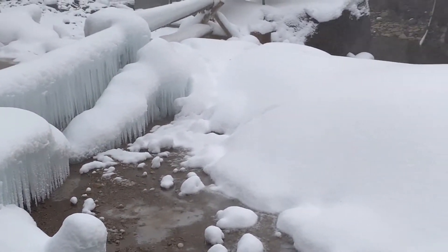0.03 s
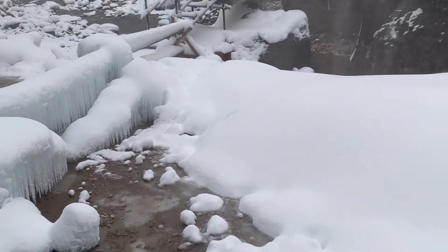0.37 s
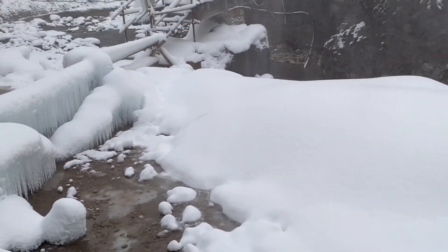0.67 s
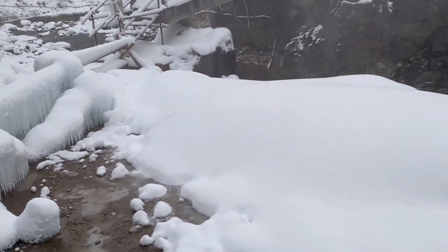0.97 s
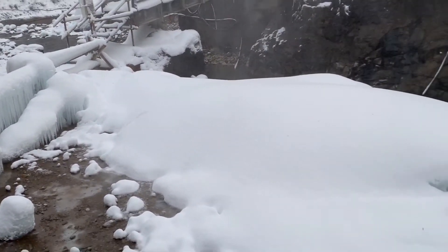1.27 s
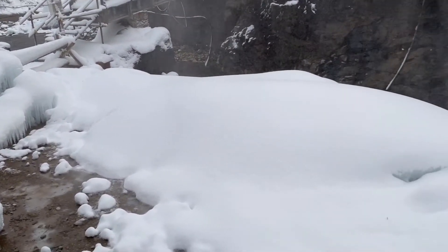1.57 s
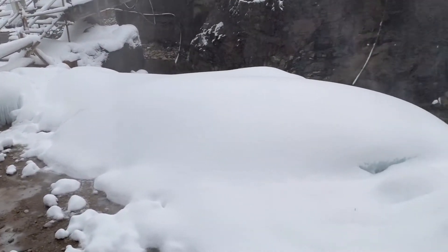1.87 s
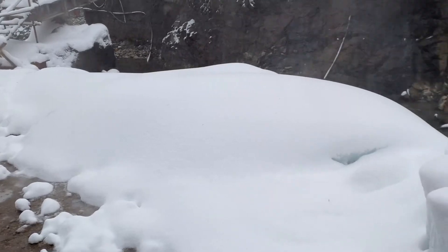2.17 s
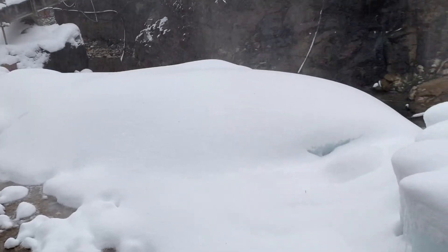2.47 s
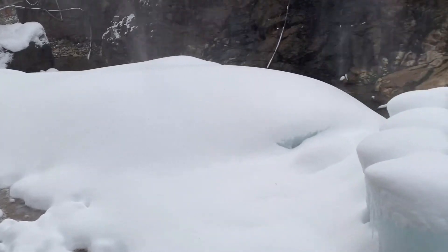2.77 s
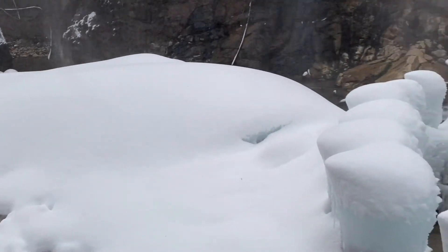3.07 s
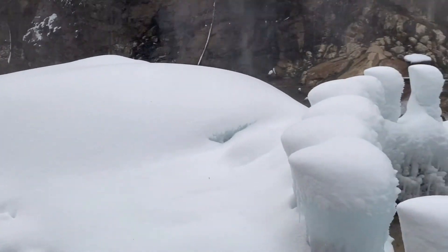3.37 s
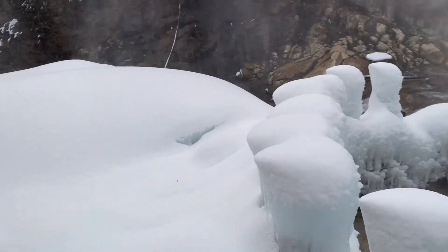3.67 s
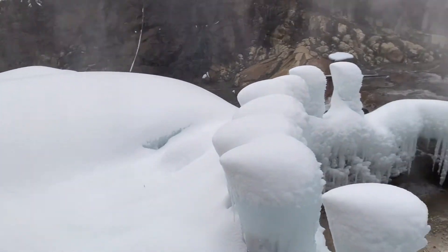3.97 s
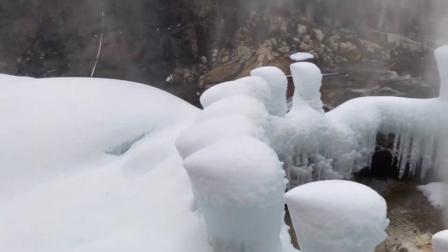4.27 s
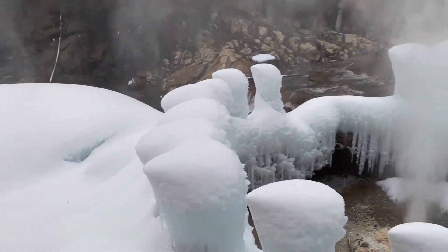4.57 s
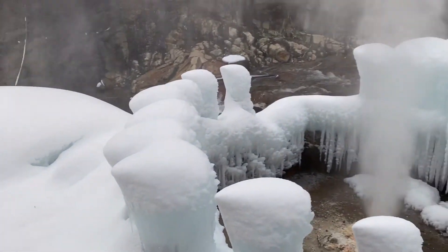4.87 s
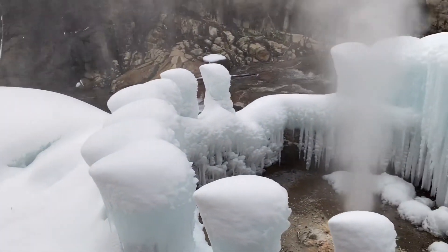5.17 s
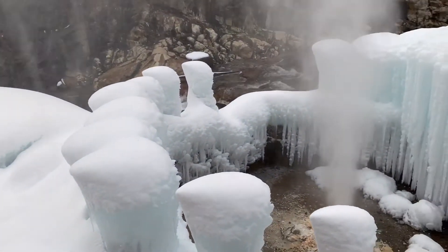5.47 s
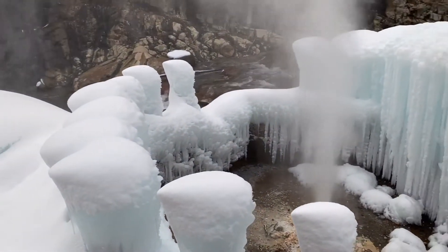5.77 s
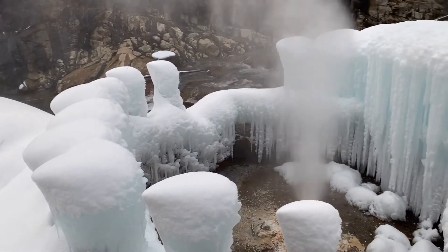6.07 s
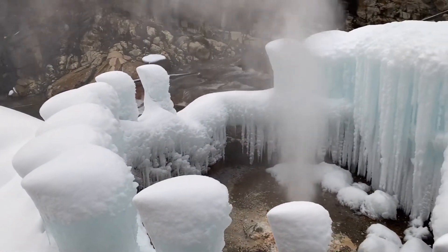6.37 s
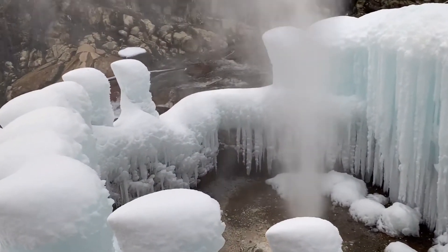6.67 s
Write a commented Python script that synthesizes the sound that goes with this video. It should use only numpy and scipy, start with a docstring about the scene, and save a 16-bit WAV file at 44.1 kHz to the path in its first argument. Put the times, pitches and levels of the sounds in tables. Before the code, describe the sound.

Outdoors, a jet of steam and boiling water hisses in quick, irregular surges, topped by a fine fizzing spray. Its mouth churns, gurgles and faintly hoots while a deep rumble pulses from underground. Everything sounds together from start to finish. The stereo microphone turns slowly toward the vent, so the spouting shifts from the right to straight ahead.

```python
"""A hot spring among snowy rocks, its vent blowing a jet of steam and boiling water.
Underground, collapsing steam pockets make the shaft throb. The mouth roars in hollow resonances,
hoots as steam blows across it and gulps as big bubbles burst; spurts of water hiss and spatter.
The stereo microphone starts with the vent far to its right, the mouth behind a snow bank,
and slowly turns to face it."""
import sys
import numpy as np
from scipy import signal
from scipy.fft import rfft, irfft, next_fast_len
from scipy.io import wavfile
from scipy.ndimage import uniform_filter1d, map_coordinates

SR = 44100
rng = np.random.default_rng(int(sys.argv[2]) if len(sys.argv) > 2 else 0)


def persist_wave(psi):
    """Save psi, clipped to +-1, as 16-bit WAV."""
    counts = np.round(np.clip(psi, -1, 1) * 32767).astype(np.int16)
    wavfile.write(sys.argv[1], SR, np.atleast_2d(counts).T)


N = 296793
TIME = np.arange(N) / SR

# deep rumble of the boiling shaft: (frequency [Hz], relative level [dB])
RUMBLE_SPECTRUM = [(15, -32), (28, -19), (35, -8.5), (52, -2), (70, -5.5), (90, -5.5), (140, -40),
                   (300, -90)]
# water column simmering between throbs: (frequency [Hz], relative level [dB])
COLUMN_SPECTRUM = [(70, -46), (90, -43), (105, -3), (119, -2.5), (140, -4.5), (165, -8.5), (195, -15),
                   (260, -57), (500, -93)]
# steam pockets collapsing underground: (time [s], half length [s], column pitch [Hz], level [dB])
SHAFT_THROBS = [(.19, .06, 121, -24), (.497, .028, 117, -23.5), (.659, 0.058, 118, -25),
                (.784, .022, 160, -25), (.877, 0.036, 116, -21.5), (.955, 0.031, 119, -21),
                (1.057, .03, 117, -24), (1.239, .022, 129, -23), (1.736, 0.043, 130, -23),
                (1.904, 0.056, 130, -22.5), (2.386, .045, 120.8, -25.5), (2.733, 0.04, 122, -22.5),
                (3.101, 0.039, 119.5, -25), (3.278, .03, 118, -22), (3.379, 0.024, 117, -22.5),
                (3.523, 0.033, 119, -20.5), (3.685, 0.043, 124, -25.5), (3.807, .025, 124, -25),
                (3.94, .05, 160, -28), (4.092, 0.022, 129, -21), (4.343, 0.034, 119, -21),
                (4.514, 0.032, 118, -23.5), (4.66, 0.027, 119, -21), (4.741, 0.022, 137, -19),
                (4.885, .03, 126, -24.5), (5.012, .03, 133, -21), (5.124, .03, 115, -21),
                (5.253, .028, 155, -25), (5.59, .04, 113, -23), (5.726, 0.024, 132, -20.5),
                (5.837, .022, 129, -23), (6.124, 0.036, 123, -20.5), (6.238, .022, 146, -27),
                (6.379, 0.024, 112, -22), (6.453, .028, 124, -25), (6.681, 0.028, 118, -21)]
# hollows of the vent and its basin: (pitch [Hz], width [Hz], relative level side-on [dB], head-on [dB])
VENT_RESONANCES = [(244.4, 37, -2.5, -5.5), (303.4, 15, 0.7, -4), (386, 18, 1, -4), (429, 14.7, 1, -1),
                   (473.5, 32, -8, -4), (590.7, 40.4, -2.5, -3.5), (636, 16, -5, -34), (788, 33, -30, -5),
                   (875, 68, -28, -10.5), (890, 13, -2, -8), (964, 48, -4, -9.5), (1006, 38, -14, -7.5),
                   (1103, 75, -18, -12.5), (1125, 44, -12, -25), (1242.6, 14, -16, 0.5),
                   (1377, 39, -0.5, -3.5), (1515, 31, -4, -5.5), (1590, 42, -7, -10), (1754, 44, -9, -9),
                   (1903, 27, -4.5, -4), (1968, 88, -34, -6), (2085, 58, -16, -4)]
# the biggest slugs of water leaving the vent: (time [s], surge of the flow [relative])
WATER_SPURTS = [(.183, 0), (.312, 1.9), (.55, 1.5), (1.063, 2), (1.276, 1), (1.503, 1.5), (1.853, 0),
                (1.98, 2.2), (2.137, 1), (2.305, 1.2), (2.457, 0.8), (2.774, 2), (2.983, 2.2), (3.086, 1.9),
                (3.214, 1.7), (3.48, 0.5), (4.123, 2), (4.26, 2), (4.36, 1.6), (4.46, 1), (4.67, 1.3),
                (4.792, 2), (5.017, 2.3), (5.526, 1.5), (5.664, 1.7), (5.766, 2.5), (5.877, 3), (6.122, 1),
                (6.288, 3.5), (6.382, 1.7), (6.452, 2), (6.537, 1.8), (6.697, 2.5)]
# the jet as heard at the microphone: (time [s], hiss level [dB], base level of the spray [dB])
JET_LEVELS = [(0, -29.5, -41.5), (1.55, -29.5, -37.5), (2.3, -26, -37), (3.4, -23, -39.5),
              (4.35, -23, -39.5), (5.4, -25, -37.5), (6.73, -28, -39)]
# steam hiss: (frequency [Hz], relative level side-on [dB], half turned [dB], head-on [dB])
HISS_SPECTRA = [(1640, -41, -44, -7.5), (2020, 5.5, 9, -9), (2370, 5.5, -1, 4), (2800, -3, 6, 1),
                (2930, -1, -5, 2), (3620, -3, 0.5, 3), (4480, -2.5, -8, 2), (4930, -6.5, -8.5, -4.5),
                (5240, -3, -13.5, -3.5), (6850, -9.5, -16.5, -21.5), (6960, -68, -27, -59),
                (14100, -71, -84, -76)]
# echoes off nearby ground and ice: (delay [ms], gain side-on [ratio], half turned [ratio], head-on [ratio])
WALL_ECHOES = [(2.1, -0.02, 0.091, -0.15), (4.0, -0.14, -0.31, -0.14), (5.6, -0.15, 0.037, -0.33),
               (6.5, 0.4, 0.39, 0.26), (7.35, 0.43, 0.38, 0.068), (8.0, -0.04, -0.019, 0.13)]
# peaks and notches drifting through roar and hiss as the microphone moves:
# (time [s], half length [s], centre [Hz], drift [Hz/s], half width [Hz], gain [dB])
DRIFTING_BANDS = [(0.8, 0.26, 1260, -100, 130, 0), (0.2, 0.72, 1430, 0, 90, -0.5),
                  (0.6, 0.5, 930, -2, 60, 2.5), (0.6, 0.99, 2200, 0, 70, -8), (0.6, 0.86, 2320, 0, 45, 5),
                  (0.6, 0.78, 2490, 0, 90.5, -3), (1.15, 0.27, 4060, 0, 119, -4),
                  (1.4, 0.37, 2980, -150, 150, 5), (1.6, .6, 3260, -250, 150, -2.5),
                  (1.4, 0.55, 4780, 0, 250, -6), (1.8, 0.67, 2090, 22, 248, -5.5),
                  (2.102, 1, 4290, -250, 280, 6.5), (2.2, 1, 5860, 0, 450, -6.5),
                  (2.6, 0.97, 2780, -78, 250, 7.5), (3.6, 0.64, 2030, 0, 190, 2),
                  (3.15, 0.4, 3400, -1, 220, 2.5), (3.247, 0.5, 5360, 0, 200, 6),
                  (3.7, 0.55, 4550, 0, 180, 3), (4.706, 1, 2990, -25, 250, 6.5),
                  (4.9, 0.52, 4560, 0, 350, -6), (5.553, 0.48, 4900, 999, 250, -3.5),
                  (5.15, 0.5, 3000, 0, 400, 2), (5.7, 0.9, 2480, 0, 50, 5), (6.45, 0.46, 5000, 0, 700, 2)]
# fine spray: (frequency [Hz], relative level side-on [dB], head-on [dB])
SPRAY_SPECTRA = [(3500, -6, -4), (6440, -1.5, -1.5), (7830, 5.5, 5.5), (10400, -4, -3), (11140, -6.5, -12),
                 (16000, 2.5, -9)]
# steam blowing across pipes and hollows of the vent, and two air pockets ringing near 1 kHz # (the rows at 1.37
# s and 6.27 s): (time [s], pitch [Hz], base level [dB])
HOOTS_AND_POCKETS = [(.29, 613, -38), (.59, 607, -33), (.98, 595, -35), (1.22, 597, -32), (1.37, 947, -30),
                     (1.49, 603, -32), (1.939, 610, -32), (2.072, 585, -33), (2.52, 612, -35), (2.65, 593, -30),
                     (2.9, 602, -28), (3.35, 612, -30.5), (3.97, 599, -36), (4.19, 609, -30), (4.44, 605, -30),
                     (4.6, 588, -34), (4.83, 604, -36), (5.29, 602, -34.5), (5.6, 590, -33.5), (5.84, 599, -30.5),
                     (6.27, 1015, -29.5), (6.42, 607, -28), (6.59, 598, -29.5)]
# big steam bubbles bursting in the mouth: (time [s], pitch of the hollow [Hz], level [dB])
MOUTH_GULPS = [(.913, 424, -28), (1.113, 241, -30.5), (1.482, 310, -28), (1.79, 308, -23.5),
               (1.937, 401, -32), (1.94, 305, -27), (2.074, 404, -27.5), (2.08, 310, -27),
               (2.963, 400, -29), (3.017, 416, -24), (3.146, 438, -25), (3.322, 312, -31),
               (3.481, 402, -29), (3.813, 440, -31), (3.894, 306, -26), (3.966, 253, -28),
               (3.972, 401, -33), (4.002, 295, -32), (4.083, 418, -26), (4.199, 293, -32),
               (4.214, 406, -26.5), (4.75, 470, -32), (4.343, 253, -28.5), (4.616, 415, -30),
               (4.619, 298, -31), (4.867, 425, -28), (5.008, 308, -28.5), (5.008, 398, -33),
               (6.025, 410, -28), (6.193, 242, -29), (6.51, 310, -28)]
# the microphone's turn: (time [s], lead of the hiss at the right capsule [ms])
MIC_TURN = [(0, 0.29), (1.1, 0.27), (2.3, 0.23), (3.5, 0.16), (4.4, 0.11), (5.1, 0.068), (6.7, 0.021)]
# sound scattered by the rocks: (frequency [Hz], level over the direct sound [dB])
ROCK_SCATTER = [(30, -8), (120, -27), (500, -23), (1500, -16), (3100, -13.5), (4500, -5), (7000, 1.5)]
# shadow of the microphone's body: (frequency [Hz], left minus right side-on [dB], head-on [dB])
MIC_SHADOW = [(304, 1.5, -0.5), (700, -5, -1.5), (1270, -2.5, -5.5), (1950, -4, 0.5), (2600, -5.5, 13),
              (3180, -3.5, -6), (3800, -4, -2), (5700, -6.5, -4), (6960, 3, 11)]


def amp(db):
    """Decibels to gain."""
    return 10 ** (np.asarray(db) / 20)


def unit(x):
    """Scale to rms 1."""
    return x / np.sqrt(np.mean(x ** 2) + 1e-20)


def envelope(x, size):
    """The running rms over stretches of size samples."""
    return np.sqrt(np.abs(uniform_filter1d(uniform_filter1d(x ** 2, size), size // 2)) + 1e-12)


def steady(x, size):
    """Hold the rms at 1 over stretches of size samples."""
    return x / envelope(x, size)


def along(points, hz):
    """Each column of a table over frequency, read on a log axis."""
    knots_hz, *columns = np.transpose(points)
    return np.array([np.interp(np.log(hz + 1), np.log(knots_hz + 1), c) for c in columns])


def curves(rows):
    """One value per sample for each column after the time."""
    times, *columns = np.transpose(rows)
    return [np.interp(TIME, times, c) for c in columns]


def wobble(rate):
    """A smooth random curve, rate knots a second."""
    coarse = TIME[::16]
    knots = rng.standard_normal(int(N * rate / SR) + 4)
    return np.interp(TIME, coarse, map_coordinates(knots, [coarse * rate]))


def swell(s, half_s):
    """A smooth rise to 1 at time s and its fall: the samples it covers and its shape."""
    near = slice(*np.searchsorted(TIME, [s - 4 * half_s, s + 4 * half_s]))
    return near, np.exp(-((TIME[near] - s) / half_s) ** 2)


def surge(swells, half_s):
    """Swing about their mean of swells given as (time, height)."""
    swing = np.zeros(N)
    for s, height in swells:
        near, shape = swell(s, half_s)
        swing[near] += height * shape
    return swing - swing.mean()


def filtered(x, response):
    """x through a complex response of frequency."""
    size = next_fast_len(N + SR // 4)
    return irfft(rfft(x, size) * response(np.fft.rfftfreq(size, 1 / SR)), size)[..., :N]


def blend(views, facing):
    """Cross-fade between the colours of one sound, from side-on (0) to head-on (1)."""
    place = facing * (len(views) - 1)
    return sum(view * np.clip(1 - abs(place - k), 0, 1) for k, view in enumerate(views))


def coloured(x, responses, facing):
    """x in the colour that it has from where the microphone points."""
    return blend([unit(view) for view in filtered(x, responses)], facing)


def drifting(x):
    """Peaks and notches come, drift at a steady speed and go as the microphone moves."""
    hz, t, spectra = signal.stft(x, SR, nperseg=1024)
    gain_db = np.zeros(spectra.shape)
    for s, half_s, centre, drift, width, db in DRIFTING_BANDS:
        near = abs(hz - centre) < 3 * (width + abs(drift) * half_s)
        offset_hz = hz[near, None] - centre - drift * (t - s)
        gain_db[near] += db * np.exp(-((t - s) / half_s) ** 2 - (offset_hz / width) ** 2)
    return signal.istft(spectra * amp(gain_db), SR, nperseg=1024)[1][:N]


def spatter(rate, share):
    """Turbulence in which a share of the power comes as tiny bursts of water, rate a second."""
    bursts = (rng.random(N) < rate / SR) * rng.standard_normal(N)
    return np.sqrt(share) * unit(bursts) + np.sqrt(1 - share) * rng.standard_normal(N)


def rings(events, rough_rad, rise_per_s=0):
    """Swelling tones of unsteady phase: (time [s], half length [s], pitch [Hz], level [dB])."""
    unrest = rough_rad * (wobble(40) + 0.26 * wobble(130))
    out = np.zeros(N)
    for (s, half_s, hz, db), start in zip(events, rng.random(len(events))):
        near, shape = swell(s, half_s)
        t = TIME[near] - s
        cycles = start + hz * t * (1 + rise_per_s * t / 2)
        out[near] += amp(db) * shape * np.sqrt(2) * np.sin(2 * np.pi * cycles + unrest[near])
    return out


def shaft(exposed):
    """Steam pockets collapse underground and make the simmering water column throb over a rumble."""
    simmer_db = -29 + 2.2 * exposed + 1.76 * wobble(17)
    column = filtered(rng.standard_normal(N), lambda hz: amp(along(COLUMN_SPECTRUM, hz)[0]))
    rumble = filtered(rng.standard_normal(N), lambda hz: amp(along(RUMBLE_SPECTRUM, hz)[0]))
    throbs = rings(SHAFT_THROBS, rough_rad=0.51)
    return throbs + amp(simmer_db) * steady(column, size=2800) + amp(-31.5) * steady(rumble, size=6000)


def mouth(exposed, flow):
    """Bursting water and steam excite the hollow resonances of the vent."""
    centre, width, *levels = np.transpose(VENT_RESONANCES)

    def hollows(hz):
        grid = np.geomspace(20, SR / 2, num=1500)[:, None]
        peaks = 1 / (1 + ((grid ** 2 - centre ** 2) / (grid * width)) ** 2)
        power = peaks @ amp(levels).T ** 2 / (1 + (grid / 2700) ** 8) / (1 + (170 / grid) ** 8)
        return along(np.c_[grid, np.sqrt(power)], hz)

    drive = spatter(rate=900, share=0.34) * amp(1.47 * wobble(45))
    roar = steady(drifting(coloured(drive, hollows, exposed)), size=5000)
    slosh = 0.00021 * SR * wobble(16)  # the heaving water level bends the resonances a little
    roar = map_coordinates(roar, [np.arange(N) + slosh], mode="mirror")
    low = filtered(roar, lambda hz: 1 / (1 + (hz / 720) ** 6))
    churn = steady(low, size=2200) * envelope(low, size=30000)  # quick swings evened out
    gulp_lift_db = surge([(s, 1.65) for s, _, _ in MOUTH_GULPS], half_s=0.022)
    churn_db = -1.45 + gulp_lift_db + 1.2 * wobble(26)
    return churn * amp(churn_db) + (roar - low) * amp(0.06 * flow)


def steam(facing, flow):
    """The jet tears the water into hissing drops; nearby walls ripple its spectrum."""
    hiss_db, _ = curves(JET_LEVELS)
    delay_ms, *gains = np.transpose(WALL_ECHOES)

    def colour(hz):
        echoes = np.array(gains) @ np.exp(-2j * np.pi * np.outer(delay_ms, hz) / 1000)
        return amp(along(HISS_SPECTRA, hz)) * (1 + echoes)

    hiss = coloured(spatter(rate=1500, share=0.29), colour, facing)
    hiss = steady(drifting(hiss), size=12000)
    spurting_db = 2.0 * flow + 1.68 * wobble(140)
    return amp(hiss_db) * unit(hiss * amp(spurting_db))


def spray(facing, flow, lead_ms=0.214):
    """Fine drops fizz in the top octave, a little to the right wherever the microphone points."""
    _, spray_db = curves(JET_LEVELS)
    fizz = coloured(spatter(rate=4000, share=0.35), lambda hz: amp(along(SPRAY_SPECTRA, hz)), facing)
    drops = filtered(fizz, lambda hz: 1 / (1 + (hz / 10000) ** 8))
    spurting = drops * amp((2.0 + 0.21 * facing) * flow)
    mist = (fizz - drops) * amp(0.73 * wobble(9.9))  # the finest mist only drifts
    delay_s = np.array([[0.5], [-0.5]]) * lead_ms / 1000
    return filtered(amp(spray_db) * (spurting + mist), lambda hz: np.exp(-2j * np.pi * hz * delay_s))


def hoots(half_s=0.057):
    """Each puff of steam sounds a hollow for a moment, and the two air pockets near 1 kHz ring likewise, all
    with a rough, unsteady pitch."""
    tones = rings([(s, half_s, hz, db) for s, hz, db in HOOTS_AND_POCKETS], rough_rad=0.76)
    return tones * amp(2.4 * wobble(70))


def gulps(half_s=0.022):
    """Each big bubble rings one hollow of the mouth, rising a little in pitch as it bursts."""
    return rings([(s, half_s, hz, db) for s, hz, db in MOUTH_GULPS], rough_rad=0.28, rise_per_s=0.64)


def bubbles(low_hz=218, high_hz=523, ring_cycles=5.3, rise=0.041, scatter_s=0.12, crowd=10):
    """A crowd of small bubbles boils up round every gulp, each a short rising ring."""
    out, t = np.zeros(N + SR), TIME[:SR // 8]
    for s, _, db in MOUTH_GULPS:
        draws = rng.normal(size=crowd), rng.random(crowd), rng.normal(size=crowd)
        for offset, pitch, strength in zip(*draws):
            hz = low_hz * (high_hz / low_hz) ** pitch
            age = hz * t / ring_cycles
            tone = np.sin(2 * np.pi * hz * t * (1 + rise * age / 2))
            shape = np.exp(-age) * (1 - np.exp(-ring_cycles * age))
            start = int(np.clip((s + scatter_s * offset) * SR, 0, N))
            out[start:start + len(t)] += amp(db + 3.3 * strength) * tone * shape
    return unit(out[:N])


def stereo_mic(direct, scattered, lead_ms, facing, bass_lead_ms=0.24):
    """The right capsule leads by lead_ms; the body's shadow and the rocks' scatter differ at each."""
    def body(hz):
        half = np.array([[0.5], [-0.5]])
        gains = amp(along(MIC_SHADOW, hz)[:, None] * half)
        detour_ms = bass_lead_ms / (1 + (hz / 700) ** 4)  # long waves bend round the body
        delay = np.exp(-2j * np.pi * hz * half * detour_ms / 1000)
        return delay * gains / np.sqrt(np.mean(gains ** 2, axis=1, keepdims=True))

    share = lambda hz: amp(along(ROCK_SCATTER, hz)[0])
    mid = filtered(direct, lambda hz: 1 / np.hypot(1, share(hz)))
    side = filtered(scattered, lambda hz: share(hz) / np.hypot(1, share(hz)))
    shift = lead_ms / 1000 * SR / 2
    left = map_coordinates(mid + side, [np.arange(N) - shift], mode="mirror")
    right = map_coordinates(mid - side, [np.arange(N) + shift], mode="mirror")
    return blend(filtered(np.array([left, right]), body), facing)


def scene():
    """One surging flow drives the jet; the microphone's turn shifts the vent's direction and colour."""
    hiss_lead_ms, = curves(MIC_TURN)
    roar_lead_ms = 1.61 * (hiss_lead_ms - 0.065)  # the roar swings wider than the hiss
    facing = np.clip((0.3 - hiss_lead_ms) / 0.26, 0, 1)  # 0 side-on, 1 head-on
    exposed = np.clip((0.325 - roar_lead_ms) / 0.3, 0, 1)  # the mouth clears the snow bank
    bank_loss_db = 2.5 * np.abs(hiss_lead_ms / hiss_lead_ms.max()) ** 2.17
    flow = surge(WATER_SPURTS, half_s=0.02) + 0.53 * wobble(30)  # small spurts come at random

    def boiling():
        tones = shaft(exposed) + hoots() + gulps()
        behind_bank = amp(-22) * mouth(exposed, flow) + amp(-41) * bubbles()
        return tones + amp(-bank_loss_db) * behind_bank

    roar = stereo_mic(boiling(), boiling(), roar_lead_ms, facing)
    hiss = stereo_mic(steam(facing, flow), steam(facing, flow), hiss_lead_ms, facing ** 3)
    return roar + hiss + spray(facing ** 2, flow)


def record(dry):
    """The recorder keeps nothing above 15.5 kHz."""
    return filtered(dry, lambda hz: hz < 15500)


dry = scene()
out = record(dry)
persist_wave(out)
```